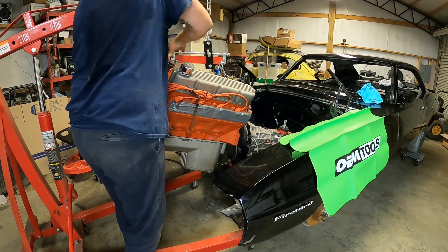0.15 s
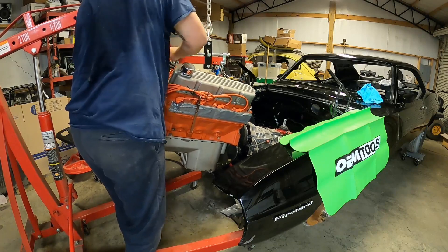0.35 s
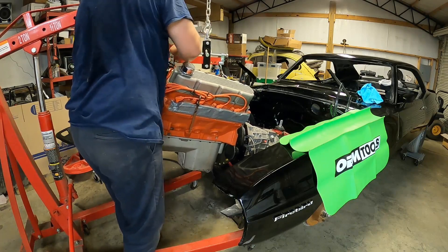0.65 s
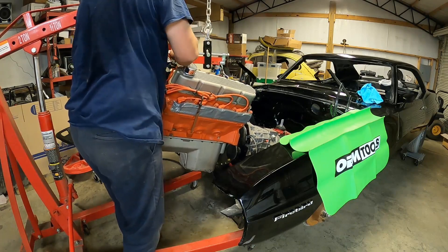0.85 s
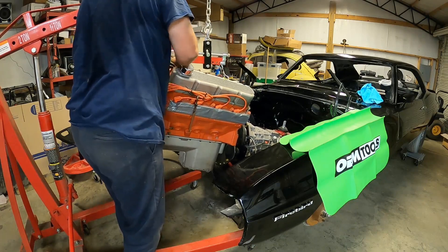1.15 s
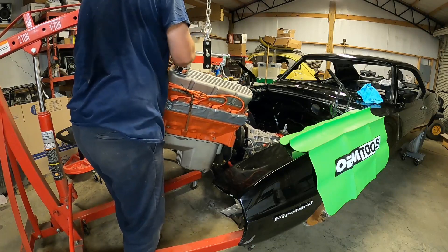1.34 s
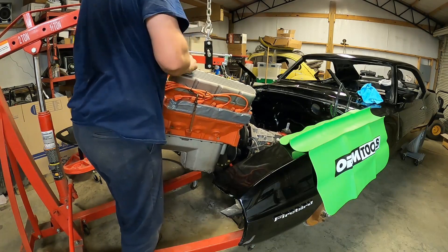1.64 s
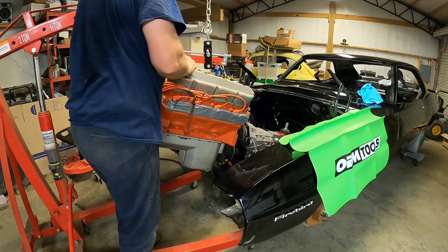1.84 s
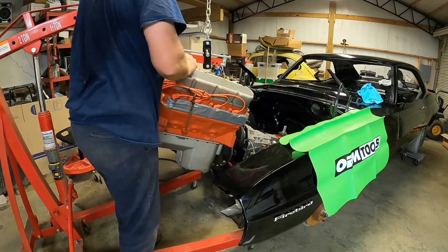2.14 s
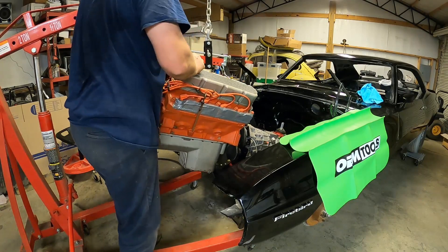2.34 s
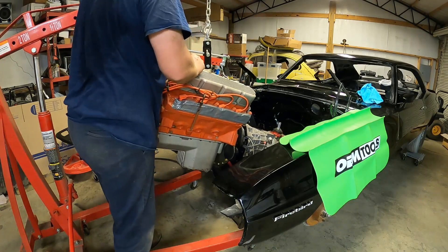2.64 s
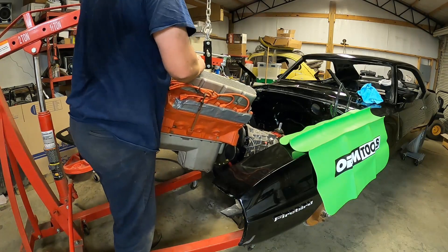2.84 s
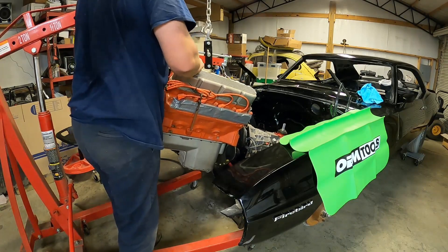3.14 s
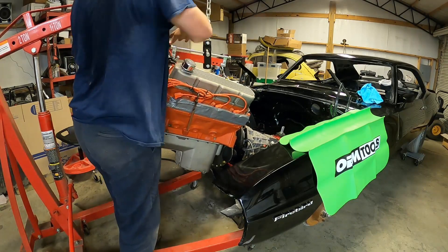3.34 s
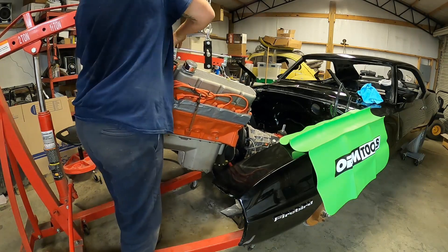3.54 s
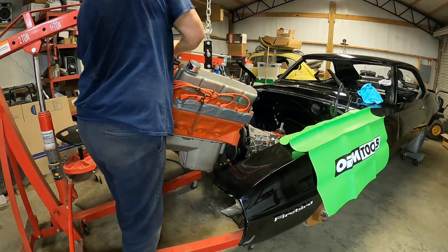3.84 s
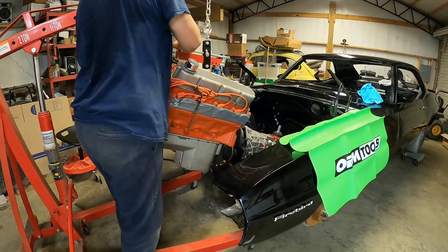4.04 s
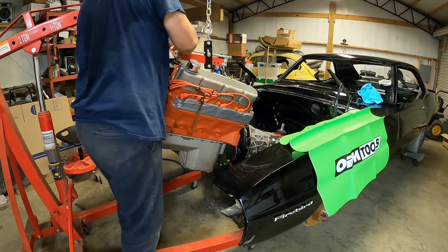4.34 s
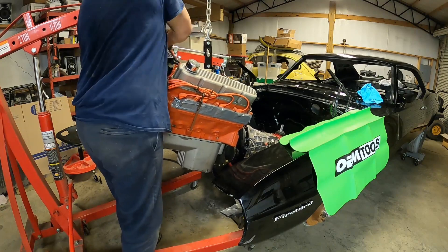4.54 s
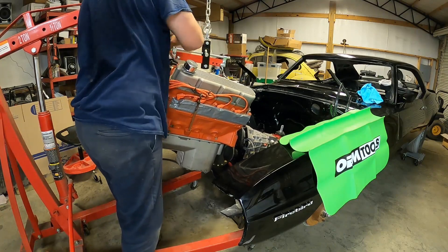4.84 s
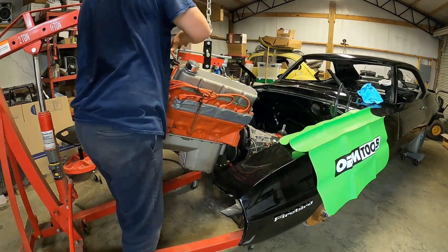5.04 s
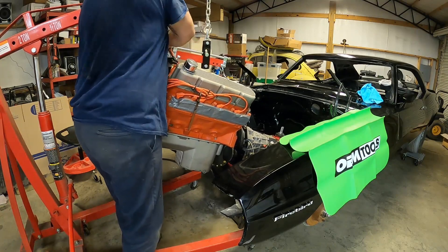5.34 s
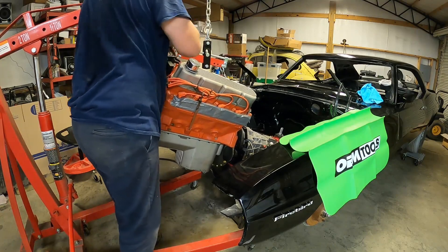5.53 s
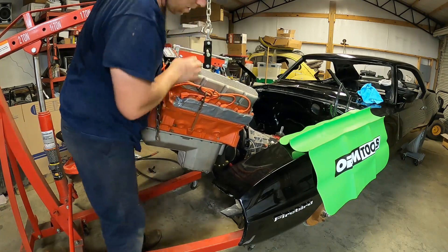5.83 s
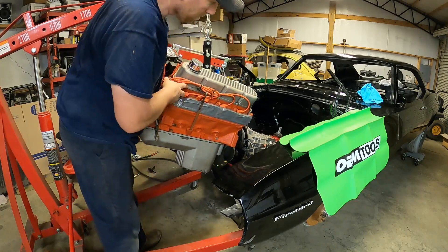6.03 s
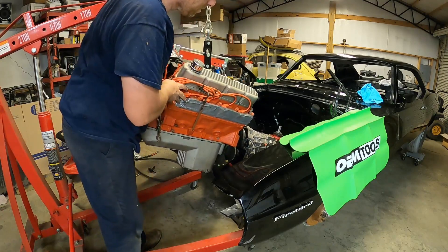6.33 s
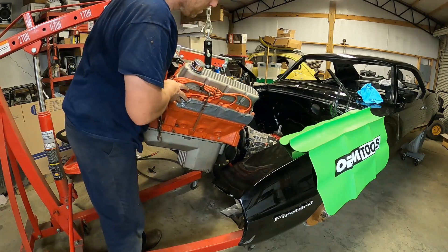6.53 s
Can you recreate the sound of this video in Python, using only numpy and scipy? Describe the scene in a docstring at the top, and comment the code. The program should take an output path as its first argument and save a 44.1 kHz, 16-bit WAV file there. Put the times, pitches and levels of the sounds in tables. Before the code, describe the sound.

A low, lumpy fan hum with faint hiss runs throughout a steel-walled garage, heard through a small stereo camera microphone close to the work. A soft clink at 0.2 s leads into a sharp chain slip and booming metal jolt at 0.25 s. From 0.5 to 0.8 s dry link rattles and bright clinks come in quick clusters, with a tiny squeak and short pings. Weaker knocks follow at 1.15, 1.4 and 1.9 s among light brushes of hands and sleeves. Two soft deep thuds bump near 2.2 s, then mostly quiet rubbing until faint ticks at 3.6 to 3.9 s. The hardest clank, a jolt with a double chain slip, hits at 4.64 s. A bright clink follows at 4.9 s, then knocks from 5.2 to 5.6 s. Soft rubs, a very high ping at 6.3 s and thin squeaks close it; room tails drop off abruptly.

```python
"""A heavy engine on a hoist chain is shifted by hand in a steel-walled garage over a fan hum of shaped noise.
A soft clink (noise rattle through link rings) leads at 0.2 s to a jolt (dying frame sines) and a chain slip (noise
burst). Pings and squeaks (sines) and rubs of hands and sleeves (grainy noise) follow; two softer jolts come near
2.2 s, the hardest lands with a slip at 4.6 s, then slips, clinks and rubs thin out to high squeaks at 6.5 s.
Near a small camera, a suppressor working in short blocks lifts fresh sound and lets room tails fall in steps."""
import sys
import numpy as np
from scipy import signal
from scipy.fft import rfft, irfft
from scipy.io import wavfile
from scipy.ndimage import uniform_filter1d, minimum_filter1d

SR = 44100
rng = np.random.default_rng(int(sys.argv[2]) if len(sys.argv) > 2 else 0)


def log_audio(samples):
    """Write samples as a 16-bit WAV file to the path given in sys.argv[1]."""
    # one column per channel
    frames = np.atleast_2d(samples).T
    # limit to full scale, then quantise
    limited = np.clip(frames, -1, 1)
    pcm = np.round(limited * 32767).astype(np.int16)
    wavfile.write(sys.argv[1], SR, pcm)


N = 294588


def amp(db):
    """Turns decibels into gain."""
    return 10 ** (np.asarray(db) / 20)


def evened(x):
    """Scales to rms 1."""
    return x / np.sqrt(np.mean(x ** 2) + 1e-20)


def read(points, hz):
    """Reads a curve on a log-frequency axis."""
    f, value = np.transpose(points)
    return np.interp(np.log(hz + 1), np.log(f + 1), value)


def add(mix, s, sound):
    """Mixes a sound in at a time in seconds."""
    part = mix[..., round(s * SR):][..., :sound.shape[-1]]
    part += sound[..., :part.shape[-1]]


def ring(modes, t, strengths):
    """A struck body rings as a sum of sines, each dying at its own speed."""
    hz, db, t60 = np.transpose(modes)[:, :, None]
    decay = amp(db - 60 * t / t60)
    return (strengths[:, None] * decay * np.sin(2 * np.pi * hz * t)).sum(0)


# the load drops into the hoist: start_s, drive_db, deep_boom_db (added to the modes below 100 Hz)
JOLT_EVENTS = [(0.252, -26.5, -15.5), (2.155, -44.5, -1.5), (2.185, -42.5, 5), (4.638, -22.5, -17.5)]
# ringing modes of the hoist frame: pitch_hz, level_db (relative), t60_s
FRAME_MODES = [(43, -3, 0.24), (52, -1.5, 0.65), (64.4, 3, .4), (81.8, 4, 0.3), (134.2, 8, 0.28),
               (166.4, -3.5, 0.35), (288.3, -9.5, 0.3), (406, -21.5, 0.35), (471, -21, 0.28),
               (586, -25.5, 0.61), (782, -32.5, 0.97), (1040, -29, 0.69), (1222, -29, 0.51),
               (1622, -32, 0.88)]


def jolts():
    """The dropped load sets the hoist frame booming; each jolt has its own share of deep modes."""
    out, t = np.zeros(N), np.arange(SR // 2) / SR
    deep = np.transpose(FRAME_MODES)[0] < 100
    build_up = 1 - np.exp(-t / 0.0016)
    for start_s, drive_db, deep_boom_db in JOLT_EVENTS:
        boom = ring(FRAME_MODES, t, amp(deep * deep_boom_db))
        add(out, start_s, amp(drive_db) * boom * build_up)
    # the camera microphone picks up little of the deepest bass
    out = signal.sosfilt(signal.butter(2, 38., "high", fs=SR, output="sos"), out)
    return out * amp([[.9], [-.9]])  # left a little louder than right


# the chain slips and many links grind at once: start_s, drive_db, contact_s, body_db, edge_db, focus_hz
SLIP_EVENTS = [(0.2484, -6, 0.058, -6.5, -15, 1410), (0.477, -20.5, 0.013, -6.5, -34, 3480),
               (0.498, -23.5, 0.02, -2, -36, 2410), (0.6644, -19, 0.029, 0.5, -16, 3780),
               (0.7654, -17, 0.033, -0.5, -16, 755), (0.7942, -24.5, 0.016, 6.5, -10, 1530),
               (0.8103, -14.5, 0.0065, -4.5, -12.5, 573), (1.1532, -32, 0.011, 3.5, -14, 1110),
               (1.4187, -39, 0.012, 11.5, -44, 694), (1.477, -33, 0.024, -3, -18, 3220),
               (1.8905, -38.5, 0.016, 3, -13.5, 1630), (3.5836, -47, .022, 6.5, -35, 1090),
               (3.7767, -48, 0.018, 12.5, -26, 1820), (4.638, -5, 0.03, -6, -11, 1280),
               (4.6617, -10, 0.056, -1.5, -15.5, 732), (4.886, -26, 0.02, 5.5, -39, 1100),
               (4.9307, -24, 0.014, 4, -12.5, 1120), (5.2063, -32, 0.011, 9, -35, 2010),
               (5.215, -23, 0.028, 1, -21, 2740), (5.4104, -33.5, 0.031, 5, -29, 1200),
               (5.441, -30.5, 0.016, 1.5, -38, 2860), (5.4658, -24.5, 0.032, -0.5, -19.5, 2980),
               (5.5974, -21, 0.029, 2, -19, 3100)]
BLOW_LEAD_S = 64 / SR  # each blow starts this far into its buffer


def slips():
    """Many links grind at once: a dry rattle with no ring, lifted around its focus."""
    out = np.zeros(N)
    for start_s, drive_db, contact_s, body_db, edge_db, focus_hz in SLIP_EVENTS:
        add(out, start_s - BLOW_LEAD_S, blow(drive_db, body_db, edge_db, contact_s, [1.], focus_hz))
    return out


# single links clink: start_s, drive_db, edge_db
CLINK_EVENTS = [(0.172, -43.5, -14), (0.4932, -18, -14), (0.7598, -18, -8), (0.7825, -23.5, -5.5),
                (1.4115, -29, -12.5), (1.9119, -42, -9), (3.8831, -46, -4), (4.4684, -42, -17.5),
                (4.8782, -16.5, -12), (6.2098, -43, -1), (6.4873, -44.5, 3.5)]
# ringing modes of the chain links: pitch_hz, level_db (relative), t60_s
LINK_MODES = [(3870, -10.5, 0.087), (4970, -4.5, 0.055), (8700, 7, 0.089)]
CLINK_CONTACT_S, CLINK_RING_DB, CLINK_BODY_DB = 0.0053, -12.5, -8.5
BODY_PER_EDGE = -0.47  # a brighter contact has less body


def clinks():
    """A brief rattle strikes a link: the dry contact plus steel modes woken unevenly."""
    out, t = np.zeros(N), np.arange(2048) / SR
    for start_s, drive_db, edge_db in CLINK_EVENTS:
        ringing = ring(LINK_MODES, t, rng.uniform(.6, 1, len(LINK_MODES)))
        steel = (t == 0) + amp(CLINK_RING_DB) * ringing / np.linalg.norm(ringing)
        body_db = CLINK_BODY_DB + BODY_PER_EDGE * edge_db
        add(out, start_s - BLOW_LEAD_S, blow(drive_db, body_db, edge_db, CLINK_CONTACT_S, steel))
    return out


def blow(drive_db, body_db, edge_db, contact_s, steel, focus_hz=3500):
    """A rattle of tiny impacts over the contact time, broad in colour, passed through what it rings."""
    u = np.arange(4096) / SR / contact_s
    hz = np.fft.rfftfreq(len(u), 1 / SR)
    grit = amp(3.0 * rng.exponential(1, len(u) // 32).repeat(32))  # some impacts are much harder
    swell = np.minimum(u / 0.16, 1) * np.exp(-u ** 4)
    rattle = rfft(np.roll(grit * rng.standard_normal(len(u)) * swell, 64))
    rattle /= np.sqrt(uniform_filter1d(np.abs(rattle) ** 2, size=60))  # many impacts even out the colour
    focus = amp(3.56 * np.exp(-.5 * (np.log((hz + 1) / focus_hz) / 0.16) ** 2))
    return amp(drive_db) * irfft(rattle * rfft(steel, len(u)) * focus * tone(hz, body_db, edge_db))


def tone(hz, body_db, edge_db):
    """Colour of a contact: more body when heavy, more edge when hard and small; the block booms near 410 Hz."""
    body = [(200, body_db - 18.5), (330, body_db + 4.5), (410, body_db + 17),
            (600, body_db + 9.0), (1400, body_db + 8.0)]
    middle = [(3600, 3.0), (6000, -3.5)]
    edge = [(10000, edge_db - 2.5), (13000, edge_db - 14.0), (15200, edge_db - 22.5)]
    return amp(read(body + middle + edge, hz))


# hands and sleeves brush the load: start_s, length_s, drive_db, edge_db
BRUSHES = [(0.41, 0.095, -75, -32), (1.242, 0.13, -63.5, -10.5), (1.602, 0.12, -66, -10.5),
           (2.066, 0.081, -68.5, -13), (2.171, 0.09, -74.5, -31.5), (2.265, .04, -67.5, -32),
           (2.32, .04, -65.5, -25.5), (2.392, 0.089, -69, -14), (2.792, 0.17, -68.5, -12.5),
           (3.298, 0.05, -75, -3), (3.405, 0.079, -73, -6), (3.965, 0.022, -72.5, -9),
           (4.378, 0.028, -68, -12), (4.525, 0.079, -75, -6.5), (5.279, 0.049, -67, -17.5),
           (5.516, 0.084, -62, -16.5), (5.819, 0.16, -70.5, -14), (6.075, 0.13, -78, -0.5),
           (6.219, 0.072, -65, -7.5), (6.365, 0.19, -73, 0.5)]
# slowly rising and falling rub of the hands on the load: time_s, drive_db
HAND_RUB = [(0, -102), (.6, -85.5), (1.5, -82), (1.95, -78), (2.15, -68.5), (2.6, -73.5), (2.9, -70.5),
            (3.2, -89), (4.2, -86), (4.4, -80), (5.0, -94.5), (5.7, -80), (6.15, -85.5), (6.68, -85.5)]
HAND_EDGE_DB, RUB_BODY_DB = -14, -6


def rubbing():
    """Grainy friction noise: a slowly rising and falling hand rub, and brushes that swell and fade."""
    brushes = np.zeros(N)
    for start_s, length_s, drive_db, edge_db in BRUSHES:
        n = round(length_s * SR)
        add(brushes, start_s, amp(drive_db) * friction(n, edge_db) * signal.windows.tukey(n, .7))
    hand_gain = amp(np.interp(np.arange(N) / SR, *np.transpose(HAND_RUB)))
    return brushes + hand_gain * friction(N, HAND_EDGE_DB)


def friction(n, edge_db):
    """Rubbing surfaces make noise in uneven grains, coloured by the contact."""
    grain = rng.standard_normal(n) * amp(2.0 * rng.exponential(1, n // 64 + 1).repeat(64)[:n])
    colour = tone(np.fft.rfftfreq(n, 1 / SR), RUB_BODY_DB + BODY_PER_EDGE * edge_db, edge_db)
    return irfft(rfft(evened(grain)) * colour, n)


# small parts and the hoist frame ping, each at one pitch: start_s, drive_db, pitch_hz
PING_EVENTS = [(.262, -39.5, 406), (.785, -49, 422.4), (1.024, -52, 1145), (1.445, -53, 690),
               (3.09, -61, 1165), (3.781, -63.5, 1435), (3.883, -63.5, 3340), (5.275, -50.5, 2690),
               (6.211, -59, 2960), (6.2893, -38.5, 11800), (6.2908, -51.5, 6800)]
PING_T60_S, PING_T60_SLOPE = 0.12, -1.6  # ring time at 1 kHz and its power law with pitch


def pings():
    """Small parts and the hoist frame ring at single pitches with a soft first cycle; higher ones die sooner."""
    out, t = np.zeros(N), np.arange(8192) / SR
    for start_s, drive_db, pitch_hz in PING_EVENTS:
        t60_s = PING_T60_S * (pitch_hz / 1000) ** PING_T60_SLOPE
        ping = ring([(pitch_hz, drive_db, t60_s)], t, np.ones(1))
        add(out, start_s, ping * np.minimum(t * pitch_hz, 1))
    return out


# thin steel squeaks: start_s, length_s, start_hz, drive_db
SQUEAK_EVENTS = [(0.632, 0.028, 5760, -72), (5.85, 0.042, 9500, -86), (5.96, .02, 8300, -81),
                 (5.977, 0.023, 9800, -80), (6.509, 0.095, 9400, -81), (6.553, .05, 8700, -80),
                 (6.59, .055, 9200, -81.5)]
SQUEAK_FALL = 0.0343  # share of the pitch lost by the end


def squeaks():
    """Steel squeaks as short wavering tones that sink a little."""
    out = np.zeros(N)
    for start_s, length_s, start_hz, drive_db in SQUEAK_EVENTS:
        t = np.arange(0, length_s, 1 / SR)
        waver_hz = 450 * uniform_filter1d(rng.standard_normal(len(t)), 60)
        hz = start_hz * (1 - SQUEAK_FALL * t / length_s) + waver_hz
        squeak = np.sin(2 * np.pi * np.cumsum(hz) / SR)
        add(out, start_s, amp(drive_db) * squeak * np.sin(np.pi * t / length_s))
    return out


# level of left over right at the ports: pitch_hz, left_right_db
PORT_TILT = [(60, 1), (150, 2), (380, 2.5), (950, 2.5), (2380, 3), (5980, 4), (15000, -5.5)]
# phase by which left leads right: pitch_hz, lead_rad
PORT_LEAD = [(100, 0.4), (900, -0.85), (4000, -1.06), (12000, -1.85)]


def ports(hz, z, same):
    """Two microphone ports: a shared part, a phase lead and a level tilt."""
    same = same[:, None]
    side = (amp(read(PORT_TILT, hz) / 2) * np.exp(.5j * read(PORT_LEAD, hz)))[:, None]
    right = same * z[0] + np.sqrt(1 - same ** 2) * z[1]
    return np.array([z[0] * side, right / side])


# left-right likeness of the room; its square root serves the direct path: pitch_hz, likeness (0 to 1)
ROOM_LIKENESS = [(300, .97), (1000, .85), (3000, .6), (12000, .55)]


def direct(x):
    """The straight path to the two ports, blurred a little by the camera body."""
    hz, _, z = signal.stft(np.array([x, np.roll(x, 90)]), SR, nperseg=256)
    return signal.istft(ports(hz, z, np.sqrt(read(ROOM_LIKENESS, hz))), SR, nperseg=256)[1][:, :N]


# decay of the steel-walled garage: pitch_hz, t60_s
GARAGE_DECAY = [(100, 0.33), (500, 0.48), (2000, 0.16), (6000, 0.099), (14000, 0.14)]


def garage(x):
    """Wall reflections as sparse taps of random sign, each band dying at its own speed."""
    taps = np.zeros((2, SR // 2))
    # one tap in every 10 samples
    at = np.arange(120, SR // 2 - 20, 10) + rng.integers(0, 10, (2, (SR // 2 - 131) // 10))
    np.put_along_axis(taps, at, rng.choice([-1., 1.], at.shape), 1)
    hz, t, z = signal.stft(taps, SR, nperseg=256)
    decay = amp(-60 * t / read(GARAGE_DECAY, hz)[:, None])
    tail = signal.istft(ports(hz, z, read(ROOM_LIKENESS, hz)) * decay, SR, nperseg=256)[1]
    return signal.fftconvolve(x[None], tail / np.linalg.norm(tail[0]), axes=1)[:, :N]


# spectrum of the fan hum and hiss: pitch_hz, density_db (relative)
HUM_SPECTRUM = [(25, -35), (105, -27), (140, -15.5), (158, -9.5), (170, -1.5), (198, 2), (212, -10),
                (232, -15), (290, -14), (340, -20.5), (410, -18.5), (560, -36), (850, -44.5), (1200, -37),
                (2300, -53), (6000, -59.5), (11000, -74.5), (15500, -82)]
# steady bright stripes in the hiss: pitch_hz, width_hz (bell curve sigma), lift_db
HISS_STRIPES = [(3170, 230, 10), (4230, 29, 6.5), (9000, 600, 9.5)]
# left-right likeness of the hum: pitch_hz, likeness (0 to 1)
HUM_LIKENESS = [(60, 1), (240, 0.97), (950, 0.83), (3770, 0.95), (15000, .3)]
HUM_RMS_DB = -45


def air():
    """Fan hum: lumpy noise in a narrow low band over a faint hiss."""
    frames, hz = N // 1024 + 5, np.fft.rfftfreq(4096, 1 / SR)
    real, imaginary, patches = rng.standard_normal((frames, 2049, 2, 3)).T
    patches = uniform_filter1d(patches[0], 30, 0)  # smooth over pitch, then over time
    patches = evened(uniform_filter1d(patches, size=3, axis=1))
    db = read(HUM_SPECTRUM, hz)
    for pitch_hz, width_hz, lift_db in HISS_STRIPES:
        db = db + lift_db * np.exp(-.5 * ((hz - pitch_hz) / width_hz) ** 2)
    z = ports(hz, real + 1j * imaginary, read(HUM_LIKENESS, hz))
    hum = signal.istft(z * amp(db[:, None] + 0.69 * patches), nperseg=4096, noverlap=3072)[1]
    return amp(HUM_RMS_DB) * evened(hum[:, :N])


def scene():
    """Near sounds with their room, over the hum; pings and jolts get no room tail."""
    near = clinks() + slips() + rubbing() + squeaks()
    return jolts() + direct(near + pings()) + amp(-2.5) * garage(near) + air()


BLOCK_S, EDGE_HZ = .032, 15450  # suppressor block and upper band limit


def record(dry):
    """A suppressor lifts bands above their recent mean, block by block; bass bypasses it; then a band limit."""
    padded = np.pad(dry, [(0, 0), (511, 511)], "reflect")
    bass = signal.oaconvolve(padded, signal.firwin(1023, 350, fs=SR)[None], "valid")
    hz, t, z = signal.stft(dry - bass, SR, nperseg=256)
    starts = np.flatnonzero(np.diff((t - .004) // BLOCK_S, prepend=-2))
    sizes = np.diff(starts, append=len(t))
    now = uniform_filter1d((np.abs(z) ** 2).mean(0), 7, 0) + 1e-20
    power = np.add.reduceat(now, starts, 1) / sizes
    keep = .78  # share of the running mean kept from block to block
    recent = signal.lfilter([0, 1 - keep], [1, -keep], power, zi=power[:, :1])[0]
    open_db = np.clip(2.19 * (10 * np.log10(power / recent) + 0.34), 0, 15.)
    open_db *= np.clip(hz / 600, 0, 1)[:, None]  # it acts less on the low middle
    open_db = np.maximum(open_db, .4 * np.roll(open_db, 1, 1))  # it closes over two blocks
    # it cannot open before the sound has come: highest recent level, held about 70 ms
    arrived_db = 0.72 + 10 * np.log10(now / np.repeat(recent, sizes, 1))
    arrived_db = -minimum_filter1d(-arrived_db, size=25, axis=1, origin=11)
    gain = amp(np.minimum(np.repeat(open_db, sizes, 1), np.maximum(arrived_db, 0)))
    out = bass + signal.istft(z * gain, SR, nperseg=256)[1][:, :N]
    band_limit = signal.firwin(511, EDGE_HZ, window=("kaiser", 9), fs=SR)
    return signal.oaconvolve(out, band_limit[None], "same")


dry = scene()
out = record(dry)
log_audio(out)
```